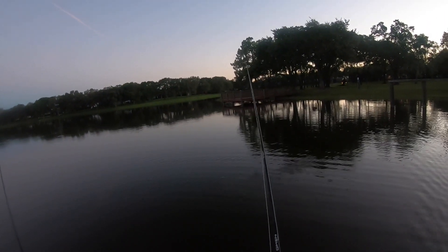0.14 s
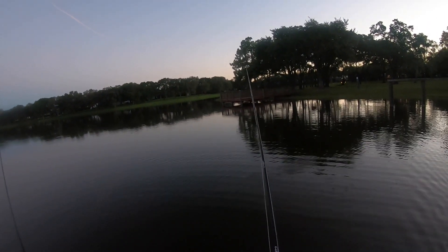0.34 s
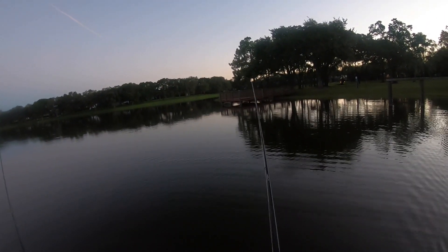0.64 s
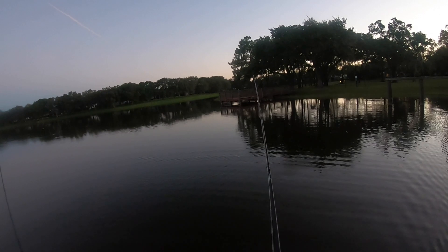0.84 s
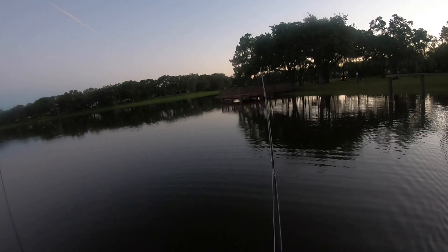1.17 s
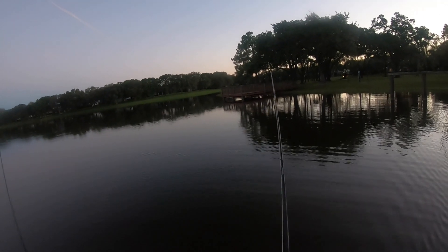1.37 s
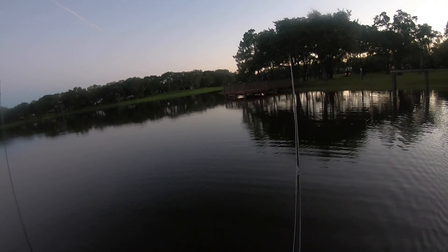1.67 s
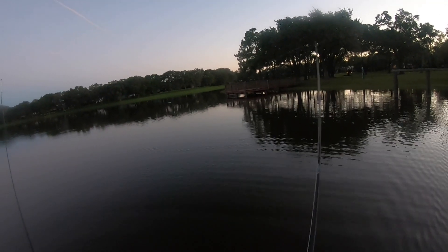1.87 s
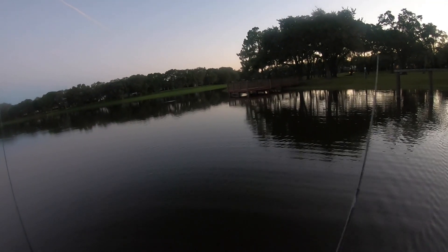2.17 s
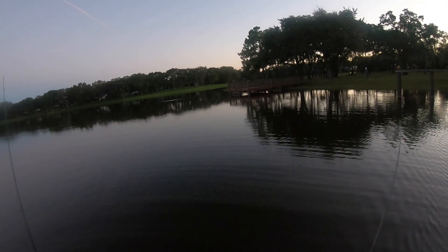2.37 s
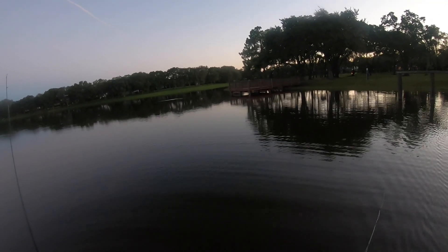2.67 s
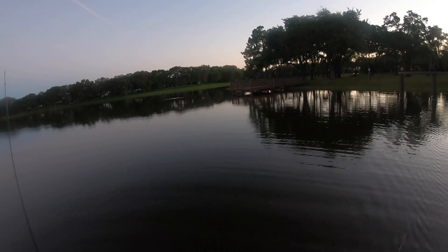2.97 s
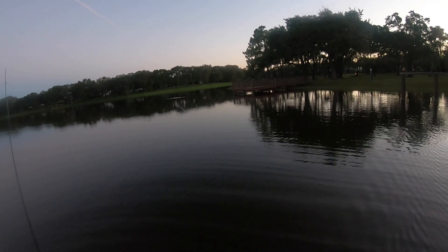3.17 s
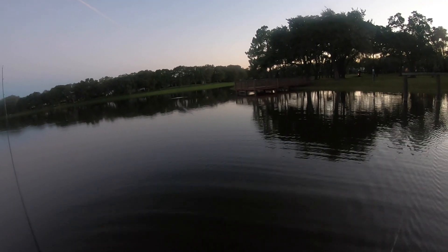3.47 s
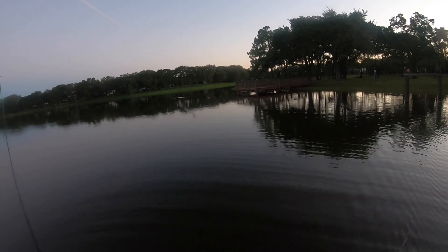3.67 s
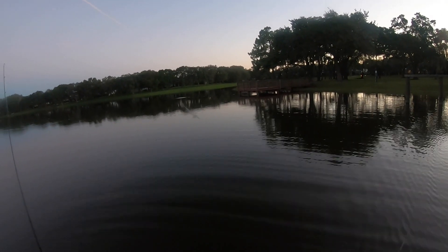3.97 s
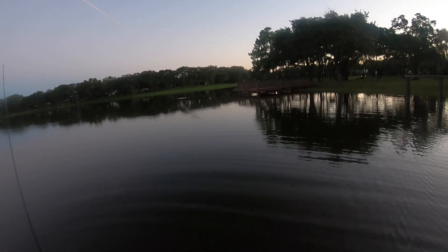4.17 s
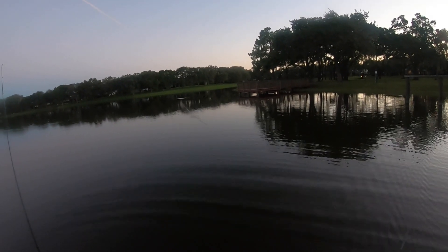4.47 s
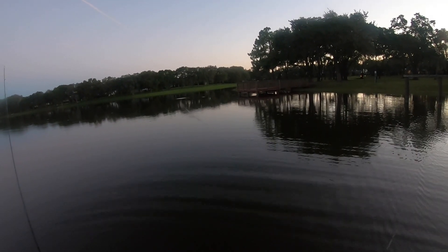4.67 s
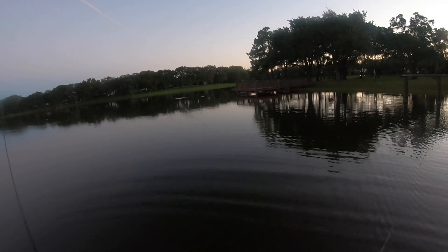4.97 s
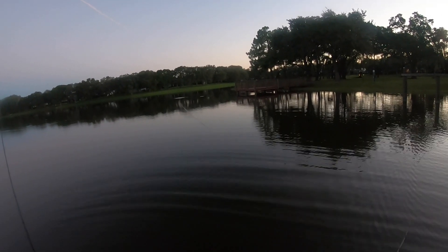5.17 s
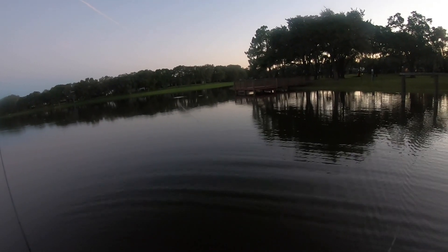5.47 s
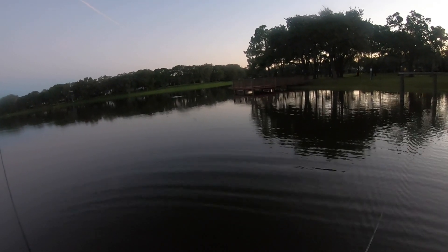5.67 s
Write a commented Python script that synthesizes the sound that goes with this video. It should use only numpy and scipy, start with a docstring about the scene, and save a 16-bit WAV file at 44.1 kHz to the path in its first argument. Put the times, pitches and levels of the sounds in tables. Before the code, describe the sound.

A fishing rod swishes softly close to the microphone, and the reel whines, falling in pitch as line hisses out. The spool stops with a few small ticks, then the handle engages with one sharp click and the gears whirr faintly in strokes. Across the calm lake a shorebird repeats falling whistles, while crickets trill, a katydid pulses and distant traffic rumbles low throughout.

```python
"""A rod swishes and a fishing reel whines, falling in pitch as the spool slows and line hisses out.
The handle clicks into gear, ringing the reel's frame, and the gears whirr softly as it winds in.
Beyond this close tackle lies a calm lake at dawn: a shorebird whistles across the water, two other
birds call faintly, katydids and crickets sing with their wings, and distant traffic rumbles."""
import sys
import numpy as np
from scipy import signal
from scipy.fft import rfft, irfft
from scipy.io import wavfile
from scipy.ndimage import uniform_filter1d

SR = 44100
rng = np.random.default_rng(int(sys.argv[2]) if len(sys.argv) > 2 else 0)


def wrap_up_sound(samples):
    """Save the sound to the file named by the first command line argument, as 16-bit audio."""
    columns = np.atleast_2d(samples).T
    # keep every value between -1 and 1, then stretch to whole-number steps
    tamed = np.clip(columns, -1, 1)
    steps = np.round(tamed * 32767).astype(np.int16)
    wavfile.write(sys.argv[1], SR, steps)


N = 257103
T = np.arange(N) / SR
FREQS = np.maximum(np.arange(N // 2 + 1) * SR / N, 1)


# The spool running down. Each row: time in seconds, whine pitch in Hz, whine level in dB,
# line hiss level in dB.
SPOOL_RUN = [(0, 8800, -57.5, -59.5), (.17, 8040, -52, -62.5), (.31, 6880, -58.5, -56),
             (.52, 6090, -51.5, -58), (.76, 5140, -57, -56), (.95, 4817, -58, -56.5),
             (.97, 3712, -60.5, -51), (1.14, 3396, -55.5, -57.5), (1.23, 3200, -51.5, -54.5),
             (1.35, 3054, -53, -55), (1.41, 2807, -62, -59), (1.525, 2610, -59, -60),
             (1.6, 2520, -110, -81)]

def cast(cycles_per_turn=26, turns_per_crossing=36.9, throb_depth=0.17, surge_db=3, surge_fade_s=0.97):
    """Whine and hiss throb once per spool turn and, early on, surge as the line crosses the spool."""
    hz, whine_db, hiss_db = in_time(SPOOL_RUN)
    turns_per_s = hz / cycles_per_turn
    crossing = np.cos(2 * np.pi * cycles(turns_per_s) / turns_per_crossing)
    swell_db = surge_db * crossing / (1 + (T / surge_fade_s) ** 8)
    turns = cycles(turns_per_s * (1 + 0.029 * drift(21)))
    throb = rms_one(1 + throb_depth * np.sin(2 * np.pi * turns))
    return spool_whine(hz, whine_db + swell_db, throb) + line_hiss(hiss_db + swell_db, throb)


def spool_whine(hz, level_db, throb, wobble=.025, second_ratio=.92, second_db=-7, octave_db=-5):
    """The spool's two bearings each sing a rough tone that falls with its speed."""
    width_hz = 0.081 * np.mean(hz)
    first = rough_tone(hz * (1 + wobble * drift(85.8)), width_hz)
    second = from_db(second_db) * rough_tone(second_ratio * hz, width_hz)
    low_speed = 1 / (1 + (hz / 4200) ** 8)   # the octave carries once it drops into the frame's range
    octave = from_db(octave_db) * low_speed * rough_tone(2 * hz, width_hz)
    whine = from_db(level_db) * rms_one(first + second + octave) * throb
    return stereo(tackle_body(whine, contrast=1.8), pan_db=-2.0)


# The line's bright hiss. Each row: frequency in Hz, relative level in dB.
LINE_TONE = [(300, -33), (1200, -11), (2200, -0.5), (3200, 1.5), (4300, -7), (5000, 0.5), (6300, 0.5),
             (7200, -3.5), (8000, 0.5), (9000, 1.5), (9900, -1.5), (10800, -14), (12500, -19.5),
             (15000, -24), (15800, -45)]

def line_hiss(level_db, throb, flutter_db=1.96):
    """Line rushes through the guides with a fluttering hiss until the spool stops."""
    running = T < SPOOL_RUN[-1][0]
    gain = from_db(level_db + flutter_db * drift(32)) * np.sqrt(abs(throb)) * running
    hiss = tackle_body(gain * coloured(LINE_TONE))
    return stereo(hiss, pan_db=-2.5, diffuse=gain * coloured(LINE_TONE))


# The swish's envelope. Each row: time in seconds, level in dB.
SWISH_ENVELOPE = [(0, -48), (.1, -45.5), (.2, -53), (.35, -52), (.5, -66), (.7, -100)]
# Its hollow midrange. Each row: frequency in Hz, relative level in dB.
SWISH_TONE = [(250, -29), (500, -2), (720, 0), (1000, -9), (1300, -4), (1700, -24), (3000, -26),
              (5000, -49), (12000, -78.5)]

def rod_swish():
    """The rod cuts the air in a short breath of noise."""
    return stereo(from_db(in_time(SWISH_ENVELOPE)[0]) * coloured(SWISH_TONE))


# Reel parts knocking. Each row: start in seconds, strength in dB, pitch the contact favours in Hz,
# leftward pan in dB.
KNOCKS = [(1.5373, -33.5, 1900, 8.5), (1.5407, -36, 1700, 2.5), (1.556, -43.5, 2050, 8),
          (1.833, -41.5, 4100, -3), (1.9114, -44.5, 4500, 1), (1.9852, -45, 2580, 7),
          (2.0614, -26, 3750, -6), (2.065, -30, 1790, 7.5), (2.303, -35, 6970, 2.5),
          (2.3095, -24, 7000, 0.5), (2.3103, -22, 2480, 4), (2.312, -26.5, 6000, -7),
          (2.314, -13.5, 5570, -10), (2.3151, -14, 8800, -17), (2.3156, -8.5, 2100, -0.5),
          (2.3183, -10.5, 735, 1), (2.326, -25, 8980, -6), (2.3276, -18.5, 2110, -7)]
# The frame's ring. Each row: mode frequency in Hz, relative level in dB, seconds to decay by 60 dB.
FRAME_MODES = [(268, -23, 0.0806), (556, -15.5, 0.019), (850, -11, 0.015), (1350, -14, .014),
               (1604, -14.5, 0.021), (2240, -4.5, 0.0074), (3020, -8, 0.012), (3390, -9, 0.013),
               (4020, -9.5, 0.0072), (4750, -9.5, 0.0086), (5890, -3, 0.0054), (7100, -10.5, 0.012),
               (7610, -5.5, 0.0049), (9450, 1.5, 0.0041), (12300, -26, .004), (14100, -26, .008)]

def reel_clicks(rattle_s=0.013, rattle_db=-35, below_db_per_octave=7, above_db_per_octave=17):
    """Each knock trails a fading rattle and rings the frame, favouring modes near its own pitch."""
    age = T[:N // 50]
    grit = rng.standard_normal((len(KNOCKS), len(age)))
    blows = (age == 0) + grit * from_db(rattle_db) * np.exp(-age / rattle_s)
    frame = np.zeros((2, N))
    for k, (hz, mode_db, t60) in enumerate(FRAME_MODES):
        force = np.zeros((2, N))
        for (start_s, db, contact_hz, pan_db), blow in zip(KNOCKS, blows):
            start = round(start_s * SR)
            octaves = np.log2(hz / contact_hz)
            # a soft contact misses the high modes
            loss_db = max(above_db_per_octave * octaves, -below_db_per_octave * octaves)
            gains = from_db(db + mode_db - loss_db + np.array([[pan_db], [0]]))
            force[:, start:start + len(age)] += gains * blow
        frame += (-1) ** k * ring(force, hz, t60)
    left, right = frame
    return np.array([stereo(left)[0], right])


# Strokes of the handle. Each row: peak time in seconds, relative level in dB, attack in seconds.
HANDLE_STROKES = [(2.401, -57, 0.045), (2.52, -66.5, 0.083), (2.86, -71.5, 0.03), (3.16, -78, 0.047),
                  (3.525, -71.5, 0.05), (3.805, -73, .04), (4.15, -75.5, 0.13), (4.44, -75, 0.064),
                  (4.825, -72, 0.11), (5.095, -74, 0.057), (5.43, -72, 0.047), (5.735, -71, 0.055)]
# The gears' whirr. Each row: frequency in Hz, relative level in dB.
GEAR_TONE = [(1200, -14), (2000, 4), (2800, 5.5), (3500, 0), (4400, -4.5), (4900, -2), (5500, -2),
             (7000, -4), (8800, -2), (10000, -14), (11500, -27.5), (15000, -34)]

def winding(gain_db=6, grain_db=2.0, release_s=0.036, mesh_hz=2550, mesh_db=-5, load_s=.25):
    """The gears whirr with each handle stroke, grinding while the spool first comes up to speed."""
    effort = np.zeros(N)
    for peak_s, db, attack_s in HANDLE_STROKES:
        width_s = np.where(T < peak_s, attack_s, release_s)
        effort += from_db(db) * np.exp(-((T - peak_s) / width_s) ** 2)
    gain = effort * from_db(gain_db + grain_db * drift(113))
    load = np.exp(-np.maximum(T - HANDLE_STROKES[0][0], 0) / load_s)
    whirr = coloured(GEAR_TONE) + from_db(mesh_db) * load * rough_tone(mesh_hz, width_hz=300)
    return stereo(tackle_body(gain * whirr), pan_db=-1.5, diffuse=gain * coloured(GEAR_TONE))


# Narrow resonances of rod and side plates. Each row: centre in Hz, width in Hz, weight in quarter dB.
BODY_PEAKS = [(2914, 26, -2.5), (3200, 43, -2), (3720, 71, -1), (4160, 52, 2.5), (4580, 19, -17.5),
              (4920, 43, -5), (6140, 38, 0), (7340, 26, -12), (7740, 39, -13), (8790, 370, -6.5)]

def tackle_body(x, contrast=0.93):
    """Rod and side plates favour their own pitches in whatever rubs on them."""
    peaks = sum(from_db(db / 4) / (1 + (2 * (FREQS - hz) / width) ** 2) for hz, width, db in BODY_PEAKS)
    gain = 1 + contrast * peaks
    treble_gain = np.mean(gain[(FREQS > 2500) & (FREQS < 9000)])
    return irfft(rfft(x) * gain / treble_gain, N)


# Rising pips that open a full call. Each row: start in seconds, fundamental in Hz, relative level in dB.
PIPS = [(2.88, 1276, -59.5), (3.635, 1334, -60), (4.485, 1262, -60.5)]
# Higher slurs down to the whistle. Each row: start in seconds, fundamental in Hz, relative level in dB.
SLURS = [(2.945, 1550, -69.5), (3.705, 1640, -73), (4.552, 1496, -64)]
# Long falling whistles. Each row: start in seconds, length in seconds, fundamental in Hz, its sag in Hz
# per second, its offset at the onset in Hz, relative level in dB, level change by the end in dB.
WHISTLES = [(1.40, .16, 1399, 851, -61, -56, 1.5), (2.141, .15, 1410, 900, -59, -61, -0.5),
            (2.997, 0.19, 1240, 350, 160, -64.5, 0), (3.746, 0.24, 1241, 482, 130, -59.5, -12.5),
            (4.6, 0.253, 1190, 579, 131, -60, -8)]

def shorebird(gain_db=-8, echo_db=-12, waver_s=.00005, unsteady_db=2.0):
    """Two lone whistles, then three full calls of pip, slur and whistle, echoing off the trees."""
    song = sum(bird_note(s, hz, db, length_s=0.044, glide_hz_per_s=850) for s, hz, db in PIPS)
    song += sum(bird_note(s, hz, db, length_s=0.041, glide_hz_per_s=-2200) for s, hz, db in SLURS)
    for start_s, length_s, hz, sag, scoop_hz, db, change_db in WHISTLES:
        song += bird_note(start_s, hz, db, length_s, -sag, scoop_hz, change_db)
    song = delayed(song, waver_s * drift(30))   # a wandering delay wavers the pitch
    song *= from_db(gain_db + unsteady_db * drift(40))
    return stereo(song + from_db(echo_db) * tree_echo(song), pan_db=10)


def bird_note(start_s, hz, db, length_s, glide_hz_per_s, scoop_hz=0, change_db=0):
    """A whistle carried by its second harmonic: it scoops onto its pitch, then glides evenly."""
    scoop_s, edge_s, third_db = .008, .012, -18
    age = np.clip(T - start_s, 0, length_s)
    phase = 2 * np.pi * cycles(hz + glide_hz_per_s * age + scoop_hz * np.exp(-age / scoop_s))
    tone = np.sin(2 * phase) + from_db(third_db) * np.sin(3 * phase)
    gate = np.clip(np.minimum(T - start_s, start_s + length_s - T) / edge_s + .5, 0, 1)
    return np.sqrt(2) * gate * from_db(db + change_db * age / length_s) * tone


def tree_echo(x, delay_s=0.1, smear_s=0.015):
    """The bank returns an echo, smeared by many trunks."""
    age = T[:N // 20]
    scatter = rng.standard_normal(len(age)) * np.exp(-age / smear_s)
    smeared = signal.fftconvolve(x, scatter / np.linalg.norm(scatter))[:N]
    return delayed(smeared, delay_s)


# One hoarse falling note. Each row: time in seconds, pitch in Hz, level in dB.
FAR_CALL = [(4.1, 1654, -100), (4.17, 1535, -71), (4.22, 1350, -60), (4.27, 1190, -67), (4.36, 1100, -100)]

def far_bird(width_hz=120):
    """Distance blurs a bird's note into a narrow band."""
    hz, db = in_time(FAR_CALL)
    return stereo(from_db(db) * rough_tone(hz, width_hz))


# Thin, high chips. Each row: start in seconds, level in dB.
CHIPS = [(2.955, -64), (3.85, -63), (5.645, -58)]

def small_bird(top_hz=7250, climb_hz=1900, length_s=0.0196):
    """Tiny notes shoot up in pitch and level off."""
    song = np.zeros(N)
    for start_s, db in CHIPS:
        progress = np.clip((T - start_s) / length_s, 0, 1)
        hz = top_hz - climb_hz * (1 - progress) ** 3
        song += from_db(db) * np.sin(np.pi * progress) * np.sin(2 * np.pi * cycles(hz))
    return stereo(song, pan_db=1)


# A pulse of about four chirps a second. Each entry: the middle of a chirp in seconds.
CHIRP_TIMES = [.076, .335, .587, .82, 1.06, 1.306, 1.555, 1.817, 2.082, 2.321, 2.573, 2.809, 3.045, 3.32,
               3.569, 3.809, 4.04, 4.277, 4.536, 4.784, 5.039, 5.302, 5.577, 5.85]

def near_katydid(level_db=-61.5, pitch_hz=8650, strokes_per_s=100, half_length_s=0.034,
                 arch_hz=45, droop_hz=70, echo_db=-17):
    """Each chirp is about seven wing strokes; the first are weaker and the pitch arches slightly."""
    gain, hz = np.zeros(N), np.full(N, float(pitch_hz))
    for middle_s in CHIRP_TIMES:
        near = abs(T - middle_s) < 2 * half_length_s
        offset_s = T[near] - middle_s
        place = offset_s / half_length_s   # -1 to 1 across the chirp
        stroke = offset_s * strokes_per_s % 1
        gain[near] = from_db(level_db + 2 * place) * np.exp(-place ** 8) * np.sin(np.pi * stroke) ** 2
        hz[near] -= arch_hz * place ** 2 + droop_hz * (stroke - .5)
    song = 2 * gain * np.sin(2 * np.pi * cycles(hz + 60 * drift(700)))
    echo = from_db(echo_db) * tree_echo(song, delay_s=0.027, smear_s=.03)
    return stereo(song + echo, pan_db=-2.5)


# Two swelling buzzes. Each row: time in seconds, relative level in dB.
BUZZ_ENVELOPE = [(2.6, -110), (2.66, -76), (2.76, -69), (2.94, -66), (2.96, -110), (5.68, -110),
                 (5.73, -75), (5.83, -67)]

def buzzing_katydid(pitch_hz=7500, strokes_per_s=122, sweep_hz=1600):
    """A second katydid buzzes with fast wing strokes, each sliding down in pitch."""
    stroke = cycles(strokes_per_s * (1 + 0.032 * drift(22))) % 1
    hz = pitch_hz - sweep_hz * (stroke - .5) + 160 * drift(700)
    gain = 2 * from_db(in_time(BUZZ_ENVELOPE)[0]) * np.sin(np.pi * stroke) ** 2
    return stereo(gain * np.sin(2 * np.pi * cycles(hz)), pan_db=-0.5)


# The far crickets' shimmer. Each row: frequency in Hz, relative level in dB.
CHORUS_TONE = [(3000, -56), (4500, -29), (5200, -1), (5600, 13), (5900, 13.5), (6200, 8), (6550, 1),
               (7000, 1), (7600, -18.5), (10000, -47), (12000, -70)]

def crickets(far_db=-66.5, near_db=-74, pitch_hz=5950, spread_hz=220, strokes_per_s=62, count=4):
    """A few nearer wing trills stand in the smooth wash of the far chorus."""
    trills = np.zeros(N)
    for offset in np.linspace(-1, 1, count):
        rate = strokes_per_s * (1 + 0.15 * offset + 0.0306 * drift(3))
        strokes = np.sin(np.pi * cycles(rate)) ** 4
        trills += strokes * rough_tone(pitch_hz + spread_hz * offset, width_hz=70)
    chorus = from_db(far_db) * coloured(CHORUS_TONE) + from_db(near_db) * rms_one(trills)
    return stereo(chorus, pan_db=-2.0, diffuse=from_db(far_db) * coloured(CHORUS_TONE))


# The bed of far roads and open air. Each row: frequency in Hz, noise density in dB.
AIR_TONE = [(20, -76.5), (45, -71), (64, -65), (90, -73.5), (130, -72.5), (200, -77), (300, -83),
            (500, -86.5), (800, -83), (980, -91.5), (1200, -88.5), (1700, -100), (2500, -106), (4300, -115),
            (7000, -113), (9700, -119), (11500, -140), (16000, -142)]
# Far engine notes. Each row: pitch in Hz, width in Hz, level in dB.
ENGINE_DRONES = [(64.5, 8.8, -56.5), (114.5, 10.2, -61), (426, 4.6, -72), (541, 19, -72)]
# Swells of the deepest rumble. Each row: time in seconds, level in dB.
RUMBLE_SWELLS = [(0.0, -50.5), (0.65, -44.5), (0.76, -57), (1.96, -46), (1.98, -54), (3.39, -47.5),
                 (3.44, -70), (3.65, -45.5), (4.25, -55), (4.37, -45.5), (4.53, -58.5), (4.68, -51),
                 (4.81, -60), (4.86, -42.5), (5.23, -56.5), (5.28, -42.5), (5.63, -53.5), (5.83, -48.5)]

def distant_traffic(deep_hz=100, steady_db=-56, evenness=0.87, lumpy_db=1.73, restless_db=1.0):
    """Far roads rumble under a few wavering engine notes; the deepest part comes in swells."""
    density = from_db(in_frequency(AIR_TONE)[0])
    bed = noise(density)
    bed += sum(from_db(db) * rough_tone(hz, width / 2) for hz, width, db in ENGINE_DRONES)
    deep = irfft(rfft(bed) / (1 + (FREQS / deep_hz) ** 8), N)
    deep_level = np.sqrt(uniform_filter1d(deep ** 2, size=SR // 4))
    even = rms_one(deep / deep_level ** evenness)   # compressed, so the swells set its shape
    swells = np.hypot(from_db(in_time(RUMBLE_SWELLS)[0]), from_db(steady_db))
    rumble = even * swells * from_db(lumpy_db * drift(13))
    upper = (bed - deep) * from_db(restless_db * drift(19))
    return stereo(rumble + upper, diffuse=noise(density))


# The stereo image. Each row: frequency in Hz, left minus right in dB, the left's phase lag in radians,
# likeness of the two sides from 0 to 1.
STEREO_IMAGE = [(40, -0.2, 0.034, 0.99), (128, 0.6, 0.075, 1), (282, 4.5, 1.03, 0.94),
                (334, 3.5, 1.45, 0.99), (478, 0, 2.31, 0.99), (696, -3, 3.16, 0.98),
                (1227, -1, 3.627, 0.97), (1827, 5, 4.07, 0.99), (2160, .5, 5.08, 0.92),
                (3950, -5, 5.21, 0.8), (5695, -13, 8.8, 0.75), (6860, -9.5, 21.64, 0.74),
                (8500, -16.5, 9.3, 0), (13950, -5.5, 7.6, 1)]

def stereo(x, pan_db=0, diffuse=None):
    """The left side faces away, so it is later and duller; diffuse sound reaches it partly unrelated."""
    balance_db, lag, alike = in_frequency(STEREO_IMAGE)
    left = rfft(x)
    if diffuse is not None:
        alike = np.clip(alike, 0, 1)
        left = alike * left + np.sqrt(1 - alike ** 2) * rfft(diffuse)
    return np.array([irfft(left * from_db(balance_db + pan_db) * np.exp(-1j * lag), N), x])


def from_db(db):
    """Decibels to gain."""
    return 10 ** (np.asarray(db) / 20)


def rms_one(x):
    """Scale to unit rms."""
    return x / np.sqrt(np.mean(x ** 2) + 1e-20)


def in_time(rows):
    """Each column of a curve at every sample."""
    seconds, *columns = np.transpose(rows)
    return [np.interp(T, seconds, column) for column in columns]


def in_frequency(rows):
    """Each column of a spectrum at every frequency."""
    hz, *columns = np.transpose(rows)
    return [np.interp(np.log(FREQS), np.log(hz), column) for column in columns]


def noise(gain):
    """Noise whose density per root Hz follows the gain."""
    return irfft(rfft(rng.standard_normal(N)) * gain, N) * np.sqrt(SR / 2)


def coloured(spectrum):
    """Unit noise with the given spectrum."""
    return rms_one(noise(from_db(in_frequency(spectrum)[0])))


def drift(rate):
    """Random wandering of spread 1, up to about rate changes a second."""
    return rms_one(noise(1 / (1 + (FREQS / rate) ** 2)))


def cycles(hz):
    """Running count of cycles of a moving frequency."""
    return np.cumsum(hz * np.ones(N)) / SR


def rough_tone(hz, width_hz):
    """A unit tone whose strength and phase wander, widening it into a band."""
    phase = 2 * np.pi * cycles(hz)
    return rms_one(drift(width_hz) * np.cos(phase) + drift(width_hz) * np.sin(phase))


def ring(force, hz, t60):
    """A unit click sets a sine of height 1 ringing."""
    decay, step = from_db(-60 / (t60 * SR)), 2 * np.pi * hz / SR
    return signal.lfilter([0, np.sin(step)], [1, -2 * decay * np.cos(step), decay ** 2], force + 1e-18)


def delayed(x, seconds):
    """The same sound, later."""
    return np.interp(T - seconds, T, x, left=0)


def scene():
    """The angler's tackle in front of the lake's dawn chorus."""
    angler = cast() + rod_swish() + reel_clicks() + winding()
    birds = shorebird() + far_bird() + small_bird()
    insects = near_katydid() + buzzing_katydid() + crickets()
    return angler + birds + insects + distant_traffic()


def record(dry):
    """A steep low-pass trims the very top."""
    cutoff_hz = 15700
    return signal.sosfilt(signal.ellip(10, .1, 80, cutoff_hz, fs=SR, output="sos"), dry)


dry = scene()
out = record(dry)
wrap_up_sound(out)
```